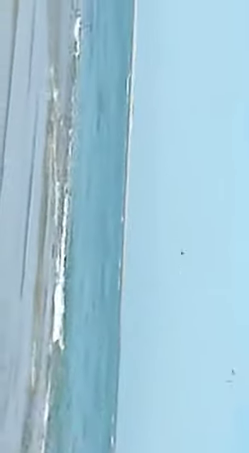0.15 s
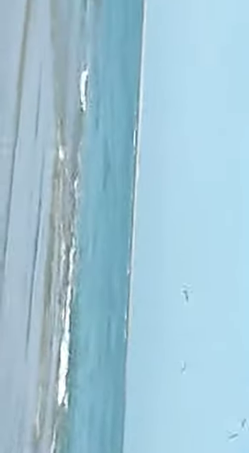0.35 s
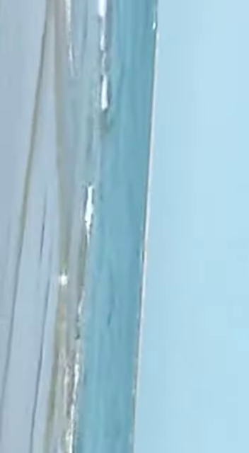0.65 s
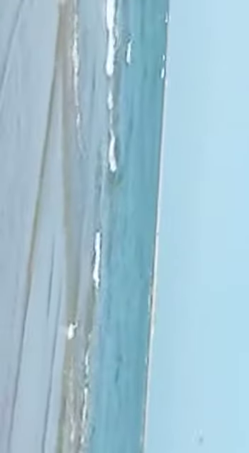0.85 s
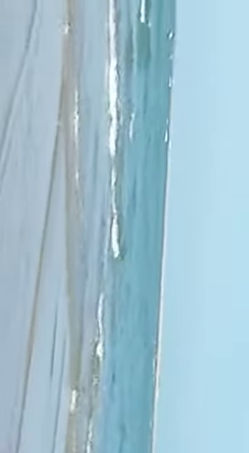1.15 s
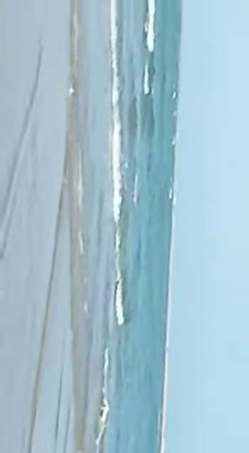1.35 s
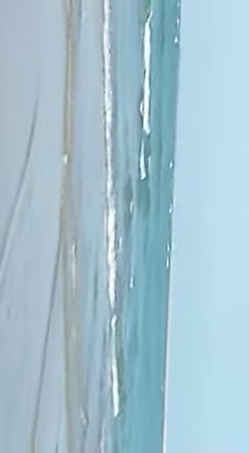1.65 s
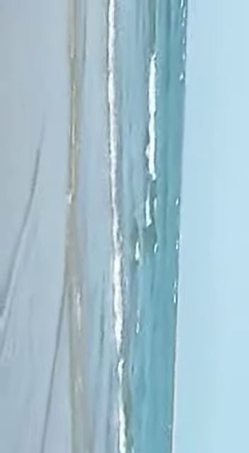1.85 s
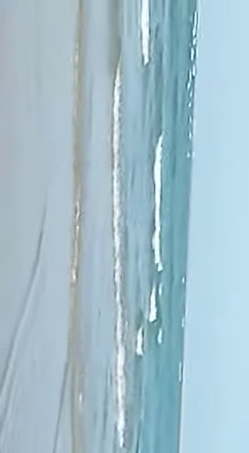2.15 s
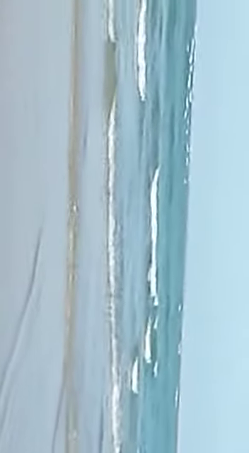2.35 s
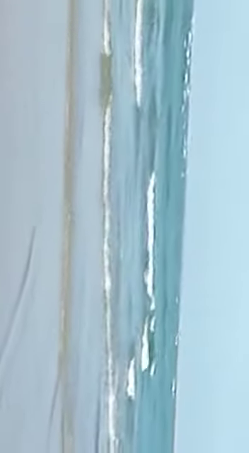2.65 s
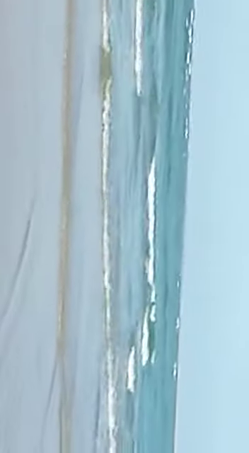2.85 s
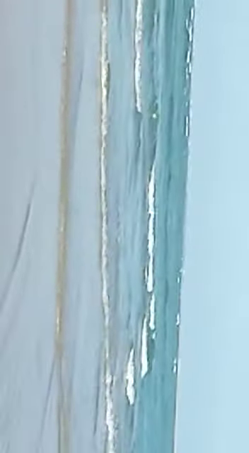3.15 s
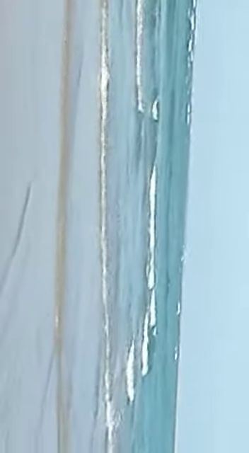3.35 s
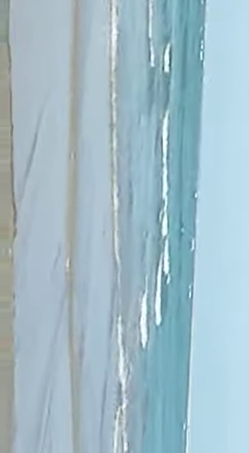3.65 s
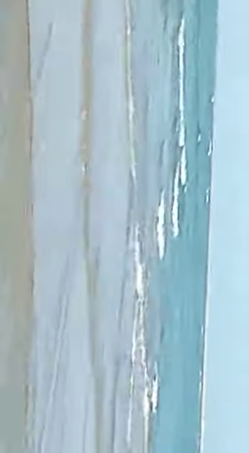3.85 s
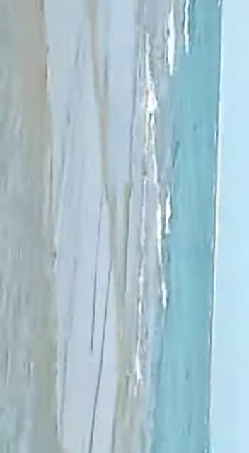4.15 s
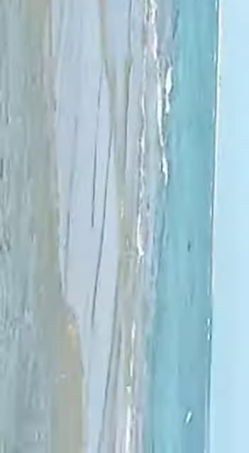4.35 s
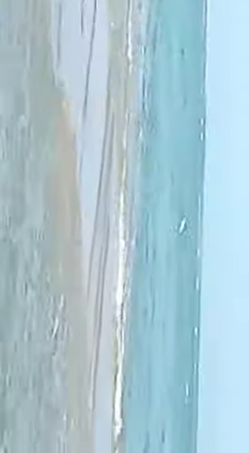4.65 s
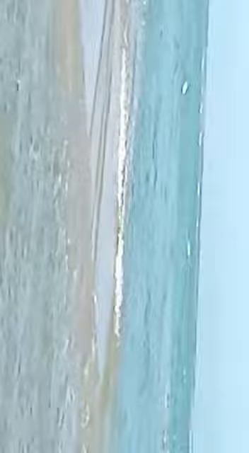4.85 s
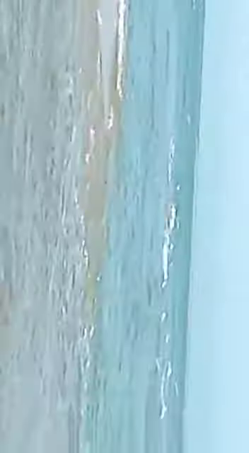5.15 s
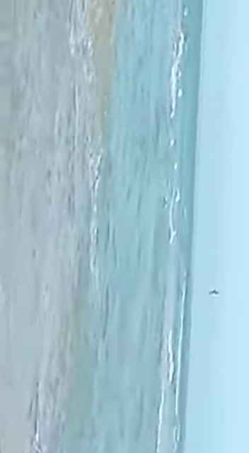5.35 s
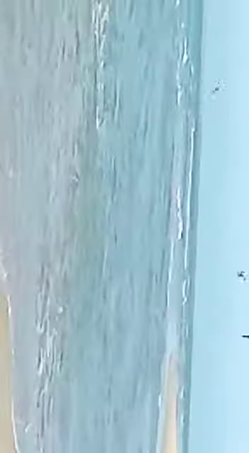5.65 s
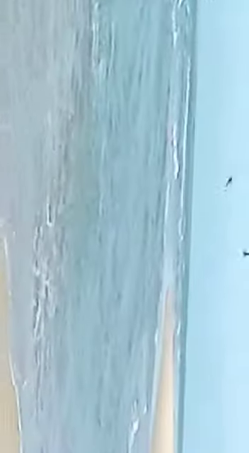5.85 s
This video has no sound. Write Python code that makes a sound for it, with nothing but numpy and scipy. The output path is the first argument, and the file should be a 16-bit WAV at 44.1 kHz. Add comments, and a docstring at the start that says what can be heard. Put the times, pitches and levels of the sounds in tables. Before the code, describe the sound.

Many seabirds shriek harshly over one another on an open beach, with heavy wind buffeting the microphone and quiet waves hissing behind.

```python
"""A colony of terns screams over a sandy shore while wind buffets the microphone.
Each call is a shrill, rough tone, mostly falling, that is chopped into a rattle.
Many calls overlap, and a few nearer birds stand out. They are built from harmonics and then coloured.
Low surf, made of filtered noise, hisses behind them.
In front, the wind rumbles, flutters and thumps: random clicks and noise, with short surges for the thumps."""
import sys
import numpy as np
from scipy import signal
from scipy.fft import rfft, irfft, next_fast_len
from scipy.io import wavfile
from scipy.ndimage import uniform_filter1d, minimum_filter1d

SR = 44100
rng = np.random.default_rng(int(sys.argv[2]) if len(sys.argv) > 2 else 0)


def unload_audio(sound):
    """Save the sound as a 16-bit wav file, at the path given as the first command line argument."""
    columns = np.transpose(np.atleast_2d(sound))
    # keep every value between -1 and 1, then stretch to whole-number steps
    steps = np.round(np.clip(columns, -1, 1) * 32767)
    wavfile.write(sys.argv[1], SR, steps.astype(np.int16))


N = 265041  # length [samples]
T = np.arange(N) / SR  # time of every sample [s]

# How loud the colony is over time, and how bright and how full its calls are:
# (time [s], level of the shrill core [dB], overtones against the core [dB], low harmonics against the core [dB])
COLONY_LEVELS = [(0.04, -23.5, -26.5, -4.5), (0.09, -25.5, -27, -3), (0.6, -17.5, -26.5, -9.5),
                 (0.7, -18, -29, -4.5), (1.38, -23, -27.5, -6), (1.69, -22, -29, -4),
                 (1.86, -25.5, -28, -4.5), (1.89, -33, -29, -5), (2.42, -27.5, -27, -3),
                 (2.74, -30.5, -27, -7.5), (2.87, -28.5, -23.5, -3.5), (3.13, -35.5, -26.5, -8),
                 (3.76, -27.5, -29, -7), (3.98, -33.5, -29, -1.5), (4.11, -28.5, -33.5, -3.5),
                 (4.29, -31, -24, -9.5), (4.41, -24.5, -29, -6), (4.77, -22.5, -29, -10.5),
                 (4.97, -27, -29.5, -6.5), (5.28, -23.5, -35, -8.5), (5.8, -26.5, -36, -6.5),
                 (5.98, -23, -35, -8)]
# The nearer birds, one call a row: (time [s], length [s], middle pitch [Hz], rattle speed [puffs per s],
# throat resonance [Hz], level against the other near calls [dB])
NEAR_CALLS = [ (0.1, 0.069, 1074, 75, 4300, -9.5), (.17, .19, 1163, 42, 3500, -4.5),
              (0.549, .11, 1263, 43, 3830, -5.5), (0.764, .14, 1023, 100.2, 4140, -7),
              (2.142, .14, 1018, 45, 3110, -3.5), (2.325, .17, 1172, 45, 2350, -9.5),
              (2.594, .13, 1258, 72, 3700, -2), (2.773, .13, 1140, 81, 4460, -3.5),
              (2.989, .17, 1237, 32, 3760, -0.5), (3.166, .14, 1083, 40, 3160, -4.5),
              (3.844, .32, 1037, 42, 2170, 0.5), (4.07, .17, 1282, 59, 2590, 0.5),
              (4.228, .22, 1174, 44, 3470, -3.5), (4.893, .15, 985, 63, 4000, -4),
              (5.525, .17, 1132, 25, 3350, -7), (5.697, 0.078, 1397, 89, 4060, -3.5)]
# Colour of the calls' lower harmonics: (frequency [Hz], relative level [dB])
THROAT_COLOUR = [(700, -4), (1000, -8.5), (1170, -8), (1400, -7.5), (1700, -0.5), (1950, -1.5), (2230, 3),
                 (2450, 0), (2700, -19), (3100, -35.5)]
# Colour of the calls' shrill core: (frequency [Hz], relative level [dB])
SHRILL_COLOUR = [(2300, -46.5), (2700, -9), (3000, -3.5), (3420, -0.5), (3900, -7.5), (4300, -8),
                 (4600, -12), (4800, -20), (5000, -27), (5300, -41), (6000, -66.5)]
# Colour of the calls' faint overtones: (frequency [Hz], relative level [dB])
OVERTONE_COLOUR = [(4600, -15.5), (5200, 1), (5600, 0.5), (6100, 4.5), (6600, 3), (7200, 2), (8000, -5),
                   (9800, -12.5), (11400, -12.5), (12500, -20), (13500, -18), (15500, -23.5)]
# Strength of the wind over time, before its uneven shoves:
# (time [s], rumble level [dB], flutter against the rumble before a shared boost [dB])
WIND_LEVELS = [(0.0, -19.5, -23), (0.17, -25.5, -13), (0.2, -22, -26), (0.35, -26.5, -14), (0.55, -18, -21),
               (0.85, -19, -23), (1.12, -13, -14.5), (1.22, -13.5, -14), (1.57, -11.5, -17.5),
               (1.66, -19, -9.5), (1.74, -12, -21), (2.09, -12, -16.5), (2.98, -12.5, -19.5),
               (3.08, -18.5, -14.5), (3.15, -16.5, -17.5), (3.58, -14.5, -14.5), (3.67, -19, -24),
               (3.73, -12.5, -16), (3.85, -22.5, -16.5), (4.23, -22.5, -24.5), (4.37, -21.5, -13.5),
               (4.42, -13, -14), (4.55, -14, -14), (4.59, -17, -18.5), (5.12, -17.5, -8.5),
               (5.2, -13, -11.5), (5.34, -21.5, -11), (5.72, -17.5, -11.5), (5.77, -23, -11.5),
               (6.01, -14, -9)]
# Colour of the wind's rumble: (frequency [Hz], relative level [dB])
RUMBLE_COLOUR = [(12, -56), (28, -38), (50, -29), (75, -3.5), (120, 1.5), (200, -1), (300, -4.5),
                 (450, -14), (700, -37), (1500, -66), (3000, -120)]
# Colour of the wind's brighter flutter: (frequency [Hz], relative level [dB])
FLUTTER_COLOUR = [(250, -4), (480, 2.5), (700, -1), (1000, -11.5), (1600, -23.5), (3000, -29.5),
                  (8000, -94.5)]
# Colour of the slow, wide eddies: (frequency [Hz], relative level [dB])
DRAUGHT_COLOUR = [(25, -18.5), (45, -9), (75, 0), (105, -3.5), (170, -21.5)]
# Colour of the surf's body: (frequency [Hz], relative level [dB])
SURF_COLOUR = [(100, -0.5), (400, -15), (800, -6.5), (1150, 0), (1450, -0.5), (2500, 2), (4500, -17.5),
               (5300, -25.5)]
# Colour of the surf's faint top: (frequency [Hz], relative level [dB])
SURF_TOP_COLOUR = [(7000, -36), (9500, -50), (15000, -66)]
# Single eddies that thump the microphone:
# (time [s], surge against the other surges [dB], tear against the other tears [dB])
EDDY_THUMPS = [(0.205, -8.5, -38), (1.098, -6.5, -31), (2.107, 2, -25), (2.937, 0.5, -34),
               (2.992, -10, -27), (3.165, -6.5, -41), (3.614, -8.5, -30), (3.751, -11.5, -31),
               (4.396, -12, -24), (4.454, -13.5, -22), (4.536, -1.5, -17), (4.802, -3.5, -21.5),
               (5.064, -9, -18.5), (5.172, -5, -19), (5.212, -14, -17.5), (5.494, -7, -20.5),
               (5.71, -7.5, -31)]
# Colours of an eddy's low surge and of its bright tear: (frequency [Hz], relative level [dB])
SURGE_COLOUR = [(30, -32), (100, 7), (260, 9.5), (600, -13.0), (1500, -46.5), (5000, -100)]
TEAR_COLOUR = [(200, -18), (520, 9.0), (1100, -5.5), (1800, -15), (6000, -74.5)]


def undb(db):
    """Turn decibels into a gain."""
    return 10 ** (np.asarray(db) / 20)


def unit(x):
    """Scale to an rms (average strength) of 1."""
    return x / np.sqrt(np.mean(x ** 2) + 1e-18)


def curves(table):
    """Draw the columns of a time table as straight lines from point to point, one value a sample."""
    times, *columns = np.transpose(table)
    return [np.interp(T, times, column) for column in columns]


def colour(x, points):
    """Filter by a spectrum of (Hz, dB) points that falls steeply above the last one; rms 1."""
    hz, db = np.transpose(points)
    size = next_fast_len(N + 4096)
    f = np.maximum(np.fft.rfftfreq(size, 1 / SR), 1)
    skirt = np.minimum(hz[-1] / f, 1) ** 10
    gain = undb(np.interp(np.log(f), np.log(hz), db))
    return unit(irfft(rfft(x, size) * skirt * gain, size)[:N])


def steady(x, seconds):
    """Even out swells slower than the given time; rms near 1."""
    size = max(int(seconds * SR), 2)
    power = uniform_filter1d(uniform_filter1d(x ** 2, size), size)
    return x / np.sqrt(np.abs(power) + 1e-12)


def wander(t, rate):
    """Draw a random line through about rate new points a second, with a spread near 1."""
    knots = rng.standard_normal(4096)
    return np.sqrt(3 / 2) * np.interp(t * rate % 4095, np.arange(4096), knots)


def add(out, s, x):
    """Mix x into out from time s, leaving off what falls outside."""
    start = int(s * SR)
    a, b = max(start, 0), min(start + len(x), N)
    if b > a:
        out[a:b] += x[a - start:b - start]


def call(length, first_hz, last_hz, rattle_hz, depth, half, throat_hz, rough,
         arch=0.0151, chirp=0.0361, uneven=0.2016, rasp=0.48, waver=0.601,
         puff_db=3.0, throat_db=8, throat_width=0.11):
    """One scream: the syrinx (voice organ) sings a sliding tone that its fluttering membranes chop into puffs."""
    t = np.arange(int(max(length, .02) * SR)) / SR
    u = t / t[-1]  # progress through the call, 0 to 1
    puffs = np.cumsum(rattle_hz * (1 + uneven * wander(t, 51.06))) / SR + rng.random()
    opening = np.sin(np.pi * puffs) ** 4
    depth = np.clip(depth, 0, 1)
    # every puff of air has its own pitch and strength
    own_pitch, own_size = rng.standard_normal((2, 128))[:, puffs.astype(int) % 128]
    # pitch arches over the call, lifts inside each puff and jitters
    lift = arch * (np.sin(np.pi * u) - .5) + chirp * (opening - .5)
    jitter = rough * (waver * own_pitch + wander(t, 700))
    slide_hz = first_hz + (last_hz - first_hz) * u
    phase = np.cumsum(slide_hz * (1 + lift + jitter)) / SR  # in cycles
    turn = np.exp(2j * np.pi * phase)
    partial, tone = np.ones_like(turn), 0
    for k, own_db in enumerate(2.73 * rng.standard_normal(size=12), 1):
        partial = partial * turn  # now the k-th harmonic
        # each bird's throat lifts the harmonics near its resonance
        lift_db = throat_db * np.exp(-(np.log(k * first_hz / throat_hz) / throat_width) ** 2)
        shifted = partial * np.exp(2j * np.pi * rng.random())
        tone = tone + undb(own_db + lift_db) * shifted.real
    # alternate cycles differ in strength, which puts lines halfway between the harmonics
    tone = tone * (1 + half * np.cos(np.pi * phase) + rasp * wander(t, 1200))
    rattle = 1 - depth + depth * opening * undb(puff_db * own_size)
    swell = np.abs(np.sin(np.pi * u)) ** .5
    return unit(tone * rattle * swell)


def chorus(count=270, pitch_hz=1130, spread=.11, fall=.07, rattle_hz=56, depth=0.62, half=0.72,
           rough=0.02386, scatter_db=1.5, throat_hz=3500):
    """Calls from many birds at varied levels, each with its own pitch, length, throat and rattle."""
    out = np.zeros(N)
    for k, (when, long, pitch, drop, speed, throat, near) in enumerate(rng.standard_normal((count, 7))):
        hz = pitch_hz * np.exp(spread * pitch)
        slide = fall * (1 + drop) / 2
        scream = call(.2 * np.exp(.3 * long), hz * (1 + slide), hz * (1 - slide),
                      rattle_hz * np.exp(.35 * speed), depth, half, throat_hz * np.exp(0.26 * throat), rough)
        # spread evenly with a little scatter, starting early so the first calls are under way
        start = (k / count) * (T[-1] + .2) - .2 + .03 * when
        add(out, start, undb(scatter_db * near) * scream)
    return out


def terns(far_treble_db=-6):
    """Near birds over the chorus; air takes some of the overtones from the far ones."""
    colony_db, facing_db, low_db = curves(COLONY_LEVELS)
    far, near = steady(chorus(), 0.11), near_birds()
    shrill = steady(colour(near + far, SHRILL_COLOUR), 0.083)
    throat = undb(low_db) * steady(colour(near + far, THROAT_COLOUR), 0.12)
    # the overtones are beamed, so they swell as birds face the microphone
    treble = near + undb(far_treble_db) * far
    overtones = undb(facing_db) * steady(colour(treble, OVERTONE_COLOUR), 0.081)
    return undb(colony_db) * (shrill + throat + overtones)


def wind(flutter_db=1.0, churn_db=2.0, churn_rate=70, whirls_per_s=420, whirl_spread_db=4.0,
         rumble_smooth=0.96, flutter_smooth=0.49, buffet_db=1.37, buffet_rate=16):
    """Small whirls strike the microphone at random amid smooth noise; they rumble and flutter more brightly."""
    gust_db, bright_db = curves(WIND_LEVELS)
    churn = undb(churn_db * wander(T, churn_rate))
    # each whirl is a click of random sign and strength
    size = rng.choice([-1, 1], N) * undb(whirl_spread_db * rng.standard_normal(N))
    whirls = unit((rng.random(N) < whirls_per_s / SR) * size)
    rumble = colour(churn * (whirls + rumble_smooth * rng.standard_normal(N)), RUMBLE_COLOUR)
    flutter = colour(churn * (whirls + flutter_smooth * rng.standard_normal(N)), FLUTTER_COLOUR)
    rumble, flutter = steady(rumble, .045), steady(flutter, .06)
    buffet = buffet_db * wander(T, buffet_rate)  # the wind comes in uneven shoves
    return undb(gust_db + buffet) * (rumble + undb(flutter_db + bright_db) * flutter)


def draught(level_db=-24.0, follow=0.32):
    """Slow, wide eddies: a deep rumble that changes only a little as the gusts grow and slacken."""
    gust_db, _ = curves(WIND_LEVELS)
    rumble = steady(colour(rng.standard_normal(N), DRAUGHT_COLOUR), 0.11)
    return rumble * undb(level_db + follow * gust_db)


def surf(level_db=-37.5, swell_db=1, flicker_db=1):
    """Small waves washing up the sand: a hiss of noise that swells slowly and flickers faster."""
    hiss = colour(rng.standard_normal(N), SURF_COLOUR + SURF_TOP_COLOUR)
    return hiss * undb(level_db + swell_db * wander(T, 1.8) + flicker_db * wander(T, 16))


def near_birds(level_db=1, sag_octaves_per_s=.45, depth=0.62, half=.5, rough=0.01586):
    """A few birds close by: fairly even rattles of chirps; every scream sags in pitch at the same rate."""
    out = np.zeros(N)
    for s, length, hz, rattle_hz, throat_hz, db in NEAR_CALLS:
        slide = 2 ** (sag_octaves_per_s * length / 2)
        scream = call(length, hz * slide, hz / slide, rattle_hz, depth, half, throat_hz, rough,
                      chirp=.07, uneven=0.13, rasp=0.49, puff_db=2.0)
        add(out, s, undb(level_db + db) * scream)
    return out


def eddies(surge_rise_s=0.0048, tear_rise_s=0.003, surge_db=-4, tear_db=3):
    """Each eddy is one brief surge of low turbulence with a shorter, brighter tear."""
    surge, tear = np.zeros(N), np.zeros(N)
    age = T[:SR // 10]
    # both rise to a peak and die away; the surge starts 2 ms before the tear
    surge_shape = age / surge_rise_s * np.exp(1 - age / surge_rise_s)
    tear_shape = age / tear_rise_s * np.exp(1 - age / tear_rise_s)
    for s, low_db, high_db in EDDY_THUMPS:
        add(surge, s - .002, undb(low_db + surge_db) * surge_shape)
        add(tear, s, undb(high_db + tear_db) * tear_shape)
    low = colour(rng.standard_normal(N), SURGE_COLOUR)
    high = colour(rng.standard_normal(N), TEAR_COLOUR)
    return surge * steady(low, 0.015) + tear * steady(high, 0.014)


def scene():
    """Birds, wind and surf at one microphone."""
    return (terns() + wind() + draught() + surf() + eddies())[None]


def record(dry, bass_hz=38, top_hz=15500):
    """The microphone sheds the deepest bass; a look-ahead limiter holds the peaks; the top is cut."""
    heard = signal.sosfilt(signal.butter(3, bass_hz, "high", fs=SR, output="sos"), dry)
    room = np.minimum(1, .95 / (np.abs(heard) + 1e-9))  # gain that keeps each sample within 0.95
    gain = uniform_filter1d(uniform_filter1d(minimum_filter1d(room, size=441), size=221), size=221)
    # 4 ms fades at both ends
    fade = np.sin(np.pi / 2 * np.minimum(1, np.minimum(T, T[-1] - T) / .004)) ** 2
    top_cut = signal.ellip(8, .2, 70, top_hz, fs=SR, output="sos")
    return signal.sosfilt(top_cut, heard * gain * fade)


dry = scene()
out = record(dry)
unload_audio(out)
```